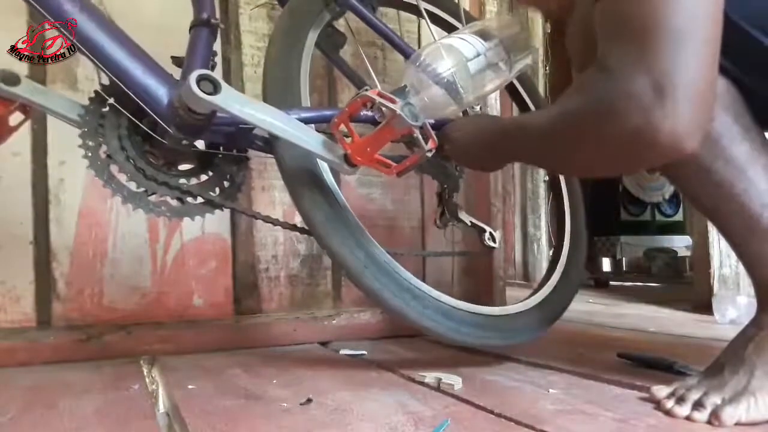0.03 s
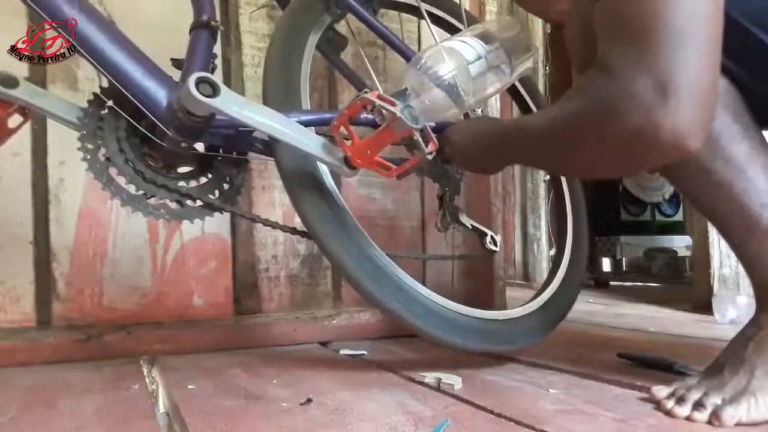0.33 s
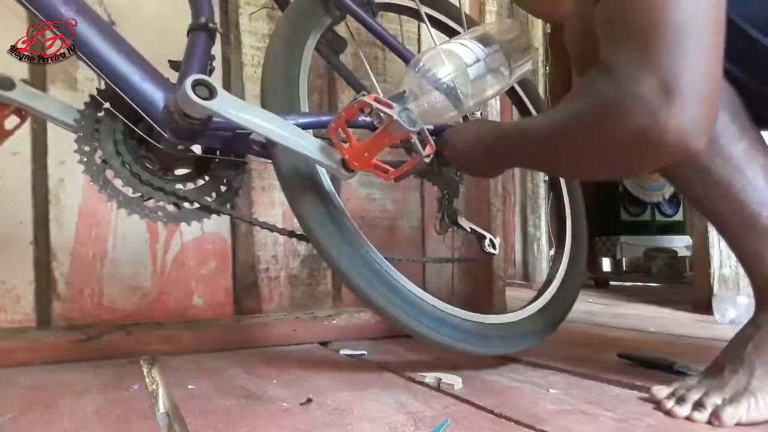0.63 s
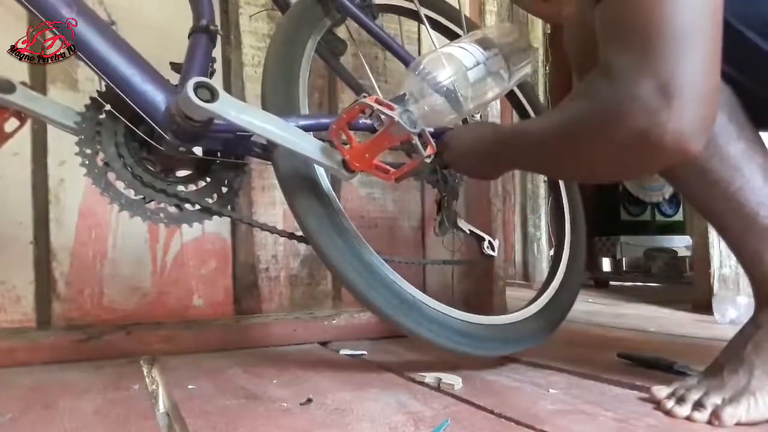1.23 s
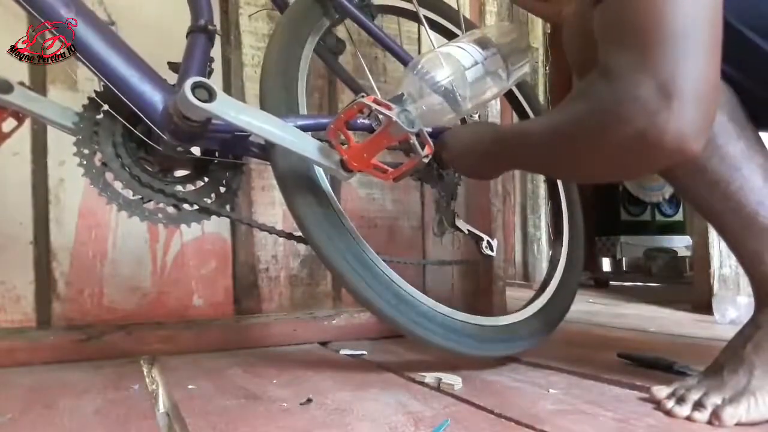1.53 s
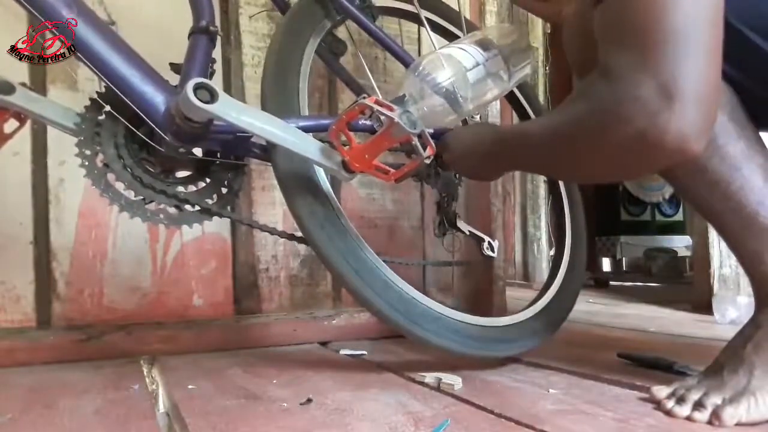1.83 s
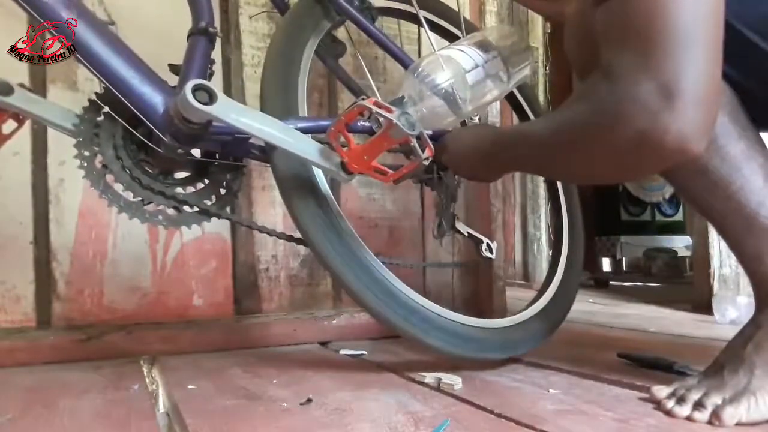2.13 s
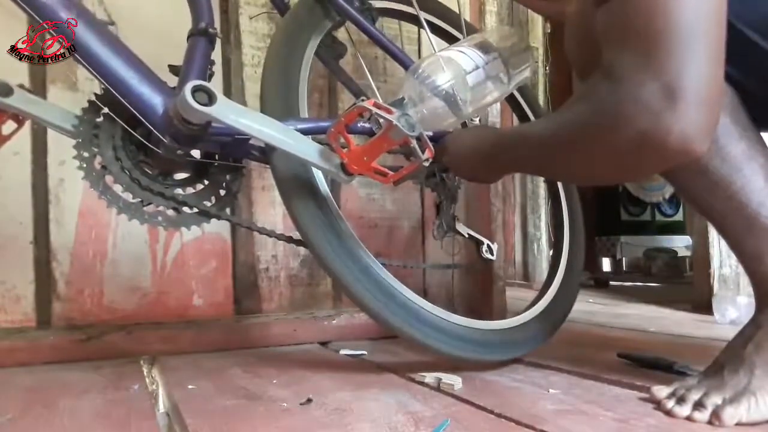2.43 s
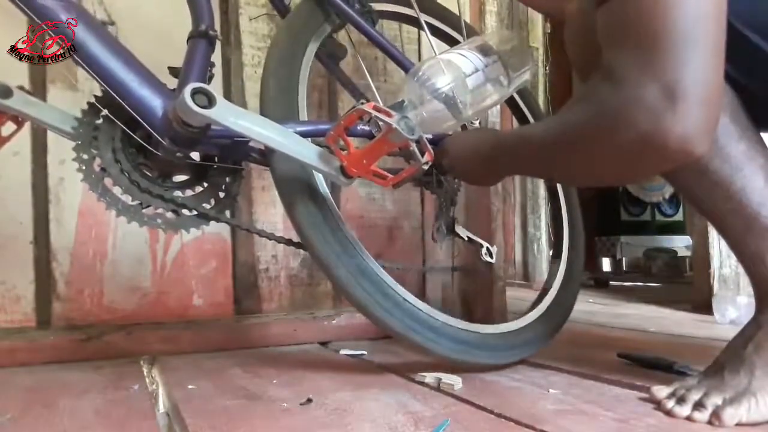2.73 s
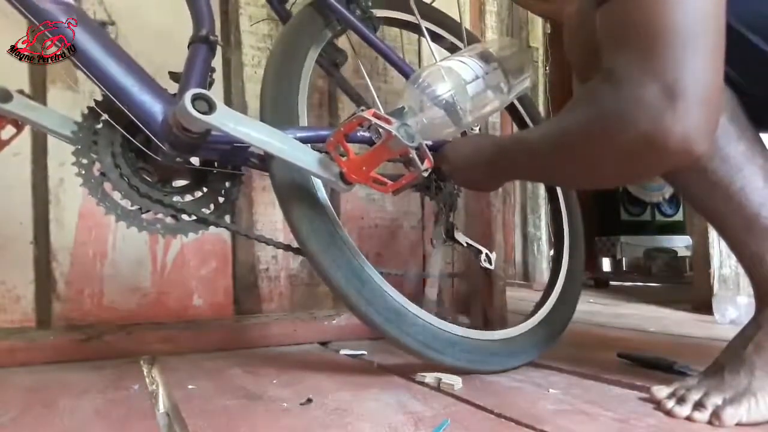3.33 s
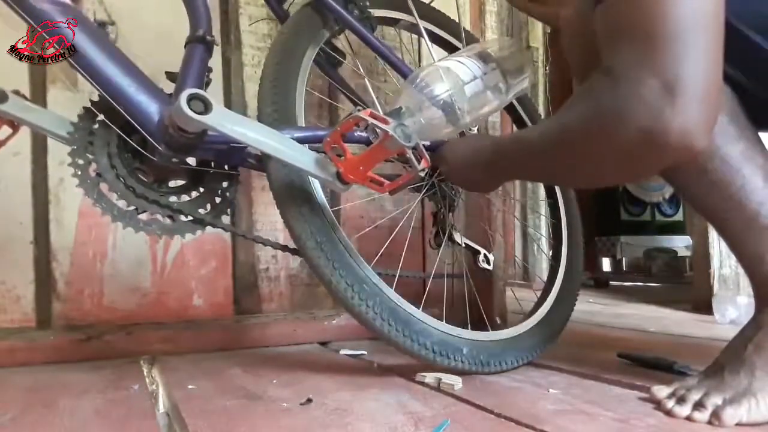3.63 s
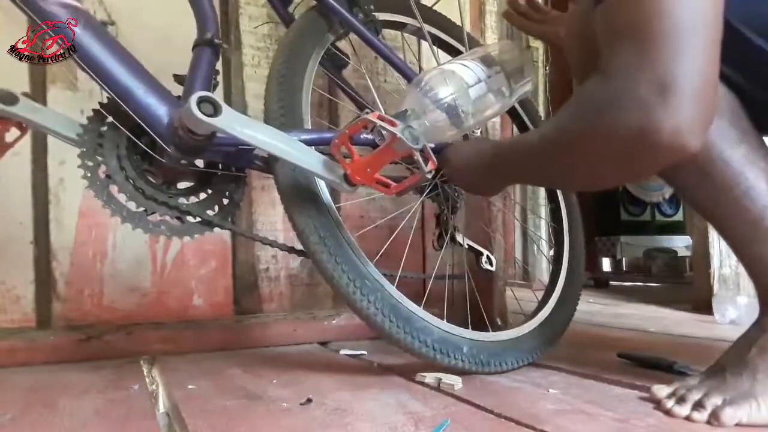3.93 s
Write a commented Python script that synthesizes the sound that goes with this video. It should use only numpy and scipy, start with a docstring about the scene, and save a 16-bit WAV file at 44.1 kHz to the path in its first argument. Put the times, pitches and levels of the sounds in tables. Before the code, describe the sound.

A plastic bottle clatters rapidly in spinning bicycle spokes, gradually slowing to a stop.

```python
"""Bicycle spokes against a plastic bottle

Close up in a small wooden room, on one microphone: a rear wheel spins down against an empty bottle.
Once a turn the spokes catch it: a sharp tick, a hollow knock, then a clatter as a run of spokes rakes by.
The turns slow from 13 to 5 a second, the wheel stops, and the spokes ring on over a faint hum."""
import sys
import numpy as np
from scipy import signal
from scipy.fft import rfft, irfft, next_fast_len
from scipy.io import wavfile
from scipy.ndimage import uniform_filter1d

SR = 44100
rng = np.random.default_rng(int(sys.argv[2]) if len(sys.argv) > 2 else 0)


def file_out(sig):
    """Save sig as 16-bit WAV at sys.argv[1]."""
    # one column per channel
    cols = np.atleast_2d(sig).T
    # limit, then scale
    lim = np.clip(cols, -1, 1)
    pcm = np.round(lim * 32767).astype(np.int16)
    wavfile.write(sys.argv[1], SR, pcm)


N = 176400

# one run of spokes a turn (start [s], relative level [dB], extra treble [dB], extra drumming [dB])
SPOKE_RUNS = [(0.0207, -9, -8, -5.5), (0.0998, -9.5, -8, -1), (0.1766, -11.5, 2.5, -4),
              (0.2535, -14.5, 3.5, 4.5), (0.3283, -16, 7.5, 5), (0.408, -12.5, 2.5, 0.5),
              (0.4865, -11, -1.5, -3.5), (0.5666, -15.5, 0, 0), (0.6526, -16, -0.5, 5.5),
              (0.7421, -14.5, 1, 1.5), (0.8305, -11, -6, -4), (0.9219, -17.5, 4.5, 0.5),
              (1.0124, -15, 1.5, -0.5), (1.1049, -14, -0.5, 2), (1.197, -12.5, -2, -4.5),
              (1.2921, -13, -2.5, 1), (1.3905, -14, 0.5, 0.5), (1.499, -14, 0.5, 3), (1.6106, -15, 2.5, 1),
              (1.721, -13, 0, -0.5), (1.8413, -12, -5, -1), (1.9587, -15, 1.5, 0.5),
              (2.0783, -16.5, 3, 1.5), (2.2008, -14.5, -1, -0.5), (2.3282, -12, -7.5, -1.5),
              (2.4611, -11.5, -1, -6), (2.6284, -14, 0, -3.5), (2.8114, -16.5, -0.5, -1.5),
              (2.9966, -15, -3, -1), (3.201, -16.5, -2, -3), (3.4077, -14.5, 3.5, -1)]
# tone of the plastic cracking (frequency [Hz], level [dB])
CRACK_COLOUR = [(60,-30.5),(280,-18),(400,4),(900,-5),(1600,-4.5),(2600,-2.5),(3600,-5.5),(5000,-8.5),(7200,-12.5),(8000,-20.5),(11000,-21.5),(15500,-29)]
CRACK_FLUTTER, CRACK_ROOM_DB = (1.4, 0.031), -0.5  # flutter is (level [dB], t60 [s])


def runs():
    """Each run of spokes cracks against the plastic and, building up later, sets the wall drumming."""
    # tone of the drumming wall (frequency [Hz], level [dB])
    drum_colour = [(30,-46.5),(70,-25.5),(180,-8.5),(300,-13),(365,3),(480,-1),(700,-5.5),(1000,-2.5),(1600,-9.5),(2500,-16.5),(4000,-17),(7000,-41),(9000,-47)]
    cracks, drumming = np.zeros(N), np.zeros(N)
    periods = np.gradient(np.array(SPOKE_RUNS)[:, 0])
    periods[-1] *= 1.45  # the wheel stalls during the last run
    for (start, db, treble_db, drum_db), period in zip(SPOKE_RUNS, periods):
        delays, levels = rake(period, start_db=-3.5, rise_turns=0.035, fall_db_per_turn=104)
        add(cracks, start, contacts(delays, levels + db - 5, CRACK_FLUTTER, CRACK_ROOM_DB, treble_db))
        delays, levels = rake(period, start_db=-4, rise_turns=0.11, fall_db_per_turn=54.5)
        drum = contacts(delays, levels + db + drum_db - 7.5, flutter=(0.41, 0.036), room_db=0.5)
        add(drumming, start, drum)
    spread_s = 0.001968
    return bottle(cracks, CRACK_COLOUR, spread_s) + bottle(drumming, drum_colour, spread_s)


def rake(period, start_db, rise_turns, fall_db_per_turn):
    """Delays [s] and levels [dB] of spoke after spoke: the pressure swells, then lets go."""
    spoke_count, unevenness, scatter_db = 36, 0.25, 2
    spoke = np.arange(spoke_count // 2 + 2)
    jitter = unevenness * rng.standard_normal(len(spoke)) * (spoke > 0)
    turns = np.abs(spoke + jitter) / spoke_count
    swell_db = start_db * (1 - turns / rise_turns)
    release_db = -fall_db_per_turn * (turns - rise_turns)
    press_db = np.where(turns < rise_turns, swell_db, release_db)
    return turns * period, press_db + scatter_db * rng.standard_normal(len(spoke))


def ticks():
    """The first spoke clips the bottle, which rebounds and touches twice more."""
    # first touch of each turn (time [s], relative level [dB], extra treble [dB])
    touches = [(0.0004, -9, -4), (0.0675, -12, -4.5), (0.1458, -14, 5.5), (0.2279, -12, -2),
               (0.3034, -15.5, 5), (0.382, -11.5, -0.5), (0.4602, -14.5, 4.5), (0.539, -10, -5),
               (0.623, -8, -2.5), (0.7109, -10, -2), (0.798, -11.5, 1), (0.8901, -10.5, -0.5),
               (0.9804, -11, 2), (1.071, -9.5, -2.5), (1.1638, -10, -3.5), (1.264, -11.5, 4),
               (1.3607, -13, 1.5), (1.4642, -14, 2.5), (1.5765, -14, 0), (1.6869, -13.5, 1.5),
               (1.8032, -13.5, 4), (1.9184, -15, 3), (2.0389, -18, 3), (2.1609, -18, 5.5),
               (2.2907, -19.5, 6), (2.4189, -18, 4.5), (2.576, -21.5, -3), (2.7523, -18, -3),
               (2.937, -21, -2), (3.1338, -23.5, 1.5), (3.3414, -22.5, -2.5)]
    # tone of a tick (frequency [Hz], level [dB])
    tick_colour = [(60,-41.5),(280,-12.5),(400,2.5),(800,3.5),(1100,-6.5),(1700,-2),(2300,-4),(3000,-1.5),(3700,-7.5),(7200,-16),(8000,-23.5),(15500,-27)]
    track = np.zeros(N)
    for start, db, treble_db in touches:
        rebound_s = 0.008 * rng.uniform(0.75, 1.25)
        delays = [0, rebound_s / 2, rebound_s]
        levels = db + np.array([-3.5, -10, -9])
        tick = contacts(delays, levels, flutter=(1.18, 0.031), room_db=1.5, treble_db=treble_db)
        add(track, start, tick)
    return bottle(track, tick_colour, spread_s=0.002897)


def knocks():
    """The bottle's wall is dented with a hollow knock, and a second spoke follows with a small bright snap."""
    # blows that dent the wall (time [s], relative level [dB])
    blows = [(0.089, -9), (0.165, 0), (0.243, -12.5), (0.319, -5), (0.396, -4.5), (0.475, -4),
             (0.555, -7.5), (0.641, -10), (0.729, -9.5), (0.817, -5.5), (0.909, -4), (1.001, -7.5),
             (1.092, -12), (1.186, -4.5), (1.283, -13.5), (1.38, -10), (1.487, -9), (1.598, -7),
             (1.712, -4.5), (1.824, -9), (1.944, -9), (2.061, -12), (2.184, -8), (2.31, -10), (2.442, -8.5),
             (2.504, -10.5), (2.612, -9), (2.674, -11), (2.787, -8), (2.863, -37), (2.974, -8.5),
             (3.037, -12), (3.17, -8.5), (3.235, -12.5), (3.376, -7)]
    # a second spoke snapping against the bottle (time [s], relative level [dB])
    snaps = [(0.0885, -10), (0.1674, -20), (0.2426, -15), (0.3204, -17), (0.3964, -19), (0.5552, -12),
             (0.6412, -10), (0.7288, -11), (0.821, -9.5), (0.911, -20), (1.3797, -21.5), (1.487, -16),
             (1.7135, -26), (2.0628, -19), (2.3144, -24.5), (2.4507, -25), (2.616, -15), (2.795, -20),
             (2.9818, -16), (3.1807, -20), (3.3884, -23)]
    # tone of a knock (frequency [Hz], level [dB])
    knock_colour = [(60,-26),(280,-14),(380,-1),(550,6),(750,-7),(1100,-3),(1400,-6.5),(2000,-7),(2750,-11.5),(3400,-15),(7000,-28),(8200,-44),(15500,-49)]
    dents, second_spokes = np.zeros(N), np.zeros(N)
    for start, db in blows:
        add(dents, start, contacts([0], [db - 6.5], flutter=(-3.5, 0.039), room_db=-1))
    for start, db in snaps:
        add(second_spokes, start, contacts([0], [db - 7.5], CRACK_FLUTTER, CRACK_ROOM_DB, treble_db=5))
    return bottle(dents, knock_colour, spread_s=0.00495) + bottle(second_spokes, CRACK_COLOUR, spread_s=0)


def contacts(delays, levels_db, flutter, room_db, treble_db=0):
    """Clicks reach the microphone, each trailed by the thin wall's flutter, reflections and the room."""
    pulses = np.zeros(SR // 4)
    onsets = np.clip(np.asarray(delays) * SR, 0, len(pulses) - 1).astype(int)
    np.add.at(pulses, onsets, amp(levels_db))
    treble = signal.lfilter(*signal.butter(1, 6000, 'high', fs=SR), pulses)
    pulses += (amp(treble_db) - 1) * treble
    flutter_db, flutter_t60 = flutter
    reflections = amp(2.5) * fading(t60=0.29)
    reverb = amp(-1.5) * fading(t60=0.56)
    response = amp(flutter_db) * fading(flutter_t60) + amp(room_db) * (reflections + reverb)
    response[0] += 0.64  # the bare click
    return signal.fftconvolve(pulses, response)


def bottle(x, colour, spread_s, size=16384):
    """Contacts heard through their colour and the body's resonances; low bending waves arrive late."""
    # resonances of bottle and wheel (frequency [Hz], width [Hz], lift [dB])
    resonances = [(382.6,14.7,4.5),(425.3,28,7),(471,9.8,7),(563.3,18,8.5),(792,24,2.5),(824,18,4.5),(925,17.6,6.5),(971,17,6),(1110,30,8.5),(1454,86,5),(1790,50,6),(2413,210,7),(2180,60,3.5),(3043,40,5.5),(3170,23,5)]
    hz = np.fft.rfftfreq(size, 1 / SR)
    lift_db = sum(db / (1 + (2 * (hz - centre) / width) ** 2) for centre, width, db in resonances)
    cepstrum = irfft(np.log(amp(along(colour, hz) + lift_db)))
    cepstrum[1:size // 2] *= 2  # minimum phase: the ring follows the blow
    cepstrum[size // 2 + 1:] = 0
    lag_s = spread_s * np.exp(-hz / 2200)
    lag_phase = 2 * np.pi * hz[1] * np.cumsum(lag_s)
    ring = irfft(np.exp(rfft(cepstrum) - 1j * lag_phase))[:size // 2]
    return signal.fftconvolve(x, 10 * ring / np.linalg.norm(ring))[:N]


def spokes(rattle):
    """Tight spokes ring with the rattle: some tones sing most while the wheel is fast, others linger."""
    # tones of the fast wheel (frequency [Hz], relative level [dB], t60 [s])
    singing_modes = [(376.1,-35,0.4),(429,-35.5,0.23),(1120,-30.5,0.17),(2530,-28,0.081),(2940,-40,.2)]
    # spokes left ringing (frequency [Hz], relative level [dB], t60 [s])
    lingering_modes = [(380,-46,0.63),(365.2,-44.5,0.97),(414.7,-43,1.6),(449.5,-42,2),(477.5,-48,1.4)]
    starts = np.array(SPOKE_RUNS)[:, 0]
    speed = np.interp(np.arange(N) / SR, starts, 1 / np.gradient(starts))
    drive = rattle * (speed / speed.max()) ** 0.91
    return ringing(drive, singing_modes) + ringing(rattle, lingering_modes)


def ringing(drive, modes, coupling_db=-24):
    """Decaying tones ring with whatever shakes them."""
    t = np.arange(2 * SR) / SR
    ring = sum(amp(db + coupling_db - 60 * t / t60) * np.sin(2 * np.pi * hz * t) for hz, db, t60 in modes)
    return signal.fftconvolve(drive, ring)[:N]


def room_tone():
    """The room's steady low noise, with faint hums that swell and fade."""
    # low hums (start [s], end [s], frequency [Hz], rms level [dB])
    hums = [(0.01,0.682,85.6,-55.5),(2.833,3.81,124,-48.5),(3.307,3.592,82.7,-53)]
    # room noise (frequency [Hz], relative level [dB])
    floor_colour = [(25,-42),(45,-24),(65,-3.5),(90,2.5),(200,3),(400,-4),(700,-14),(1500,-15),(3000,-22.5),(6000,-31.5),(15000,-53)]
    t = np.arange(N) / SR
    hum, fade_s = np.zeros(N), 0.069
    for start, end, hz, db in hums:
        swell = np.clip(np.minimum(t - start, end - t) / fade_s, 0, 1)
        hum += amp(db) * swell * np.sqrt(2) * np.sin(2 * np.pi * hz * t)
    return hum + amp(-49) * noise(floor_colour)


def noise(colour):
    """Steady coloured noise of rms 1."""
    x = filtered(rng.standard_normal(N), lambda hz: amp(along(colour, hz)))
    return x / np.sqrt(np.mean(x ** 2) + 1e-20)


def fading(t60):
    """A tail of noise with energy 1 that falls 60 dB in t60 seconds."""
    t = np.arange(2 * SR // 3) / SR
    tail = rng.standard_normal(len(t)) * amp(-60 * t / t60)
    return tail / np.linalg.norm(tail)


def amp(db):
    """Decibels to gain."""
    return 10 ** (np.asarray(db) / 20)


def along(points, hz):
    """Interpolate (frequency [Hz], level [dB]) points on a log frequency axis."""
    freqs, levels = np.transpose(points)
    return np.interp(np.log(hz + 1), np.log(freqs + 1), levels)


def filtered(x, gain):
    """Apply a gain that depends on frequency."""
    size = next_fast_len(N + SR // 2)
    return irfft(rfft(x, size) * gain(np.fft.rfftfreq(size, 1 / SR)), size)[:N]


def add(track, start, sound):
    """Mix a sound into a track at start [s]."""
    i = int(np.clip(round(start * SR), 0, N - 1))
    track[i:i + len(sound)] += sound[:N - i]


def scene():
    """At the microphone: the bottle's rattle, the ringing spokes and the room tone."""
    rattle = ticks() + knocks() + runs()
    return (rattle + spokes(rattle) + room_tone())[None]


def record(dry):
    """The recorder gates quiet treble down, rounds off peaks, adds hiss and limits the bandwidth."""
    # the recorder's band of hiss (frequency [Hz], relative level [dB])
    hiss_colour = [(20,-47),(6500,-43),(7150,-3.5),(7750,-3.5),(8100,-33.5),(15000,-22)]
    gate_hz, threshold_db, depth_db = 1223, -53.5, -4
    ceiling, top_hz = 0.66, 15850
    treble = filtered(dry[0], lambda hz: hz ** 2 / (hz ** 2 + gate_hz ** 2))
    power = np.abs(uniform_filter1d(treble ** 2, size=882))  # over 20 ms
    closed = 1 / (1 + (power / amp(threshold_db) ** 2) ** 2)
    gated = dry[0] - closed * (1 - amp(depth_db)) * treble
    rounded = gated / (1 + (gated / ceiling) ** 6) ** (1 / 6)
    return filtered(rounded + amp(-61) * noise(hiss_colour), lambda hz: hz < top_hz)[None]


dry = scene()
out = record(dry)
file_out(out)
```